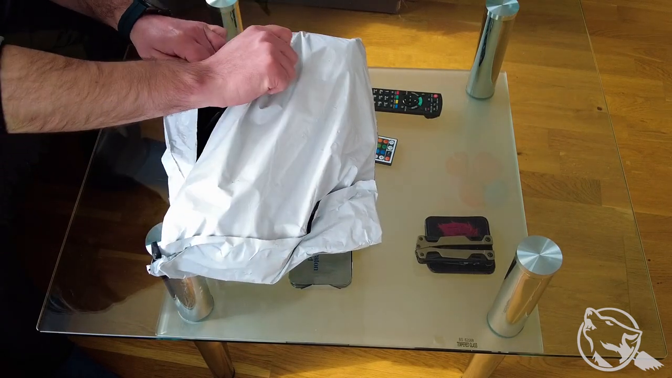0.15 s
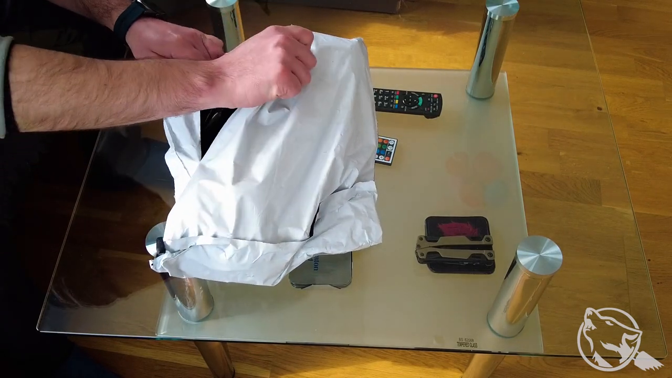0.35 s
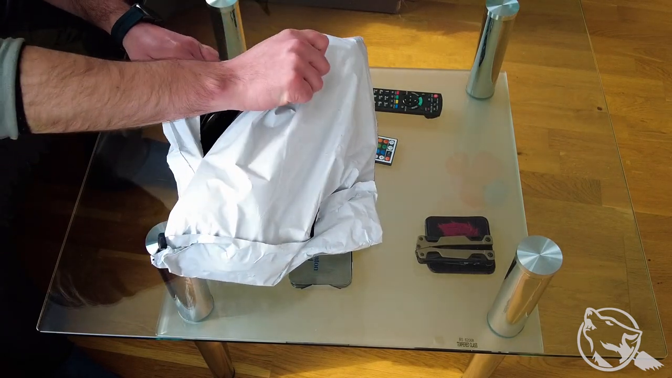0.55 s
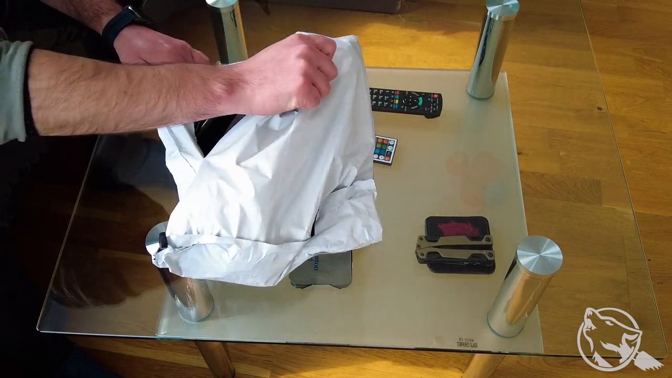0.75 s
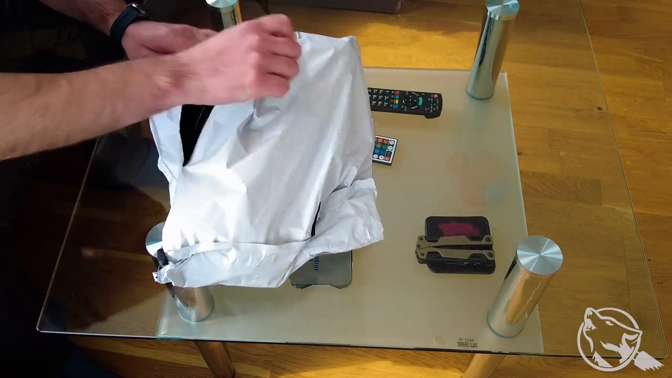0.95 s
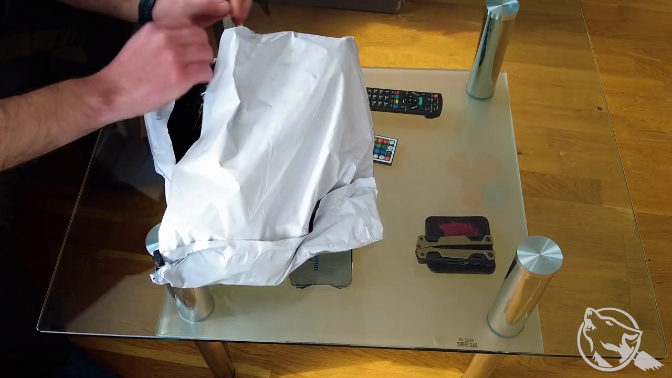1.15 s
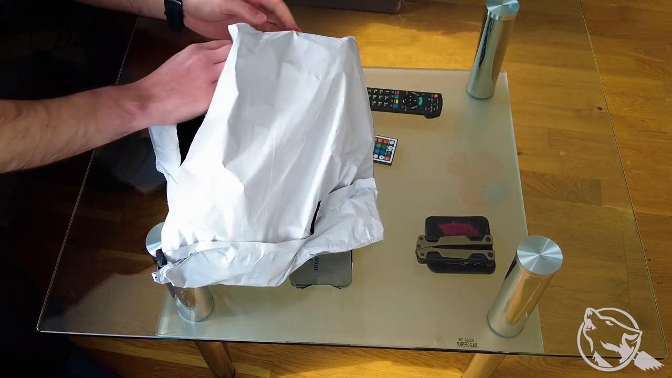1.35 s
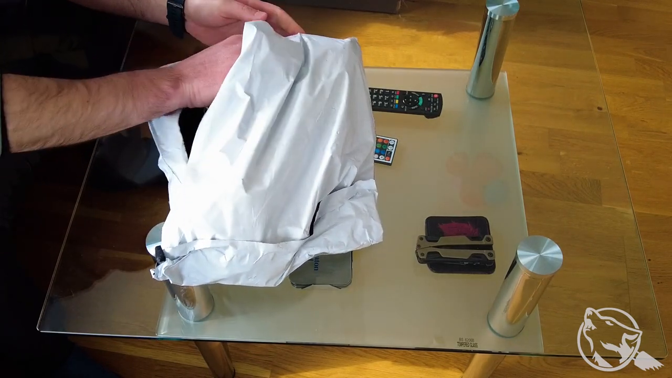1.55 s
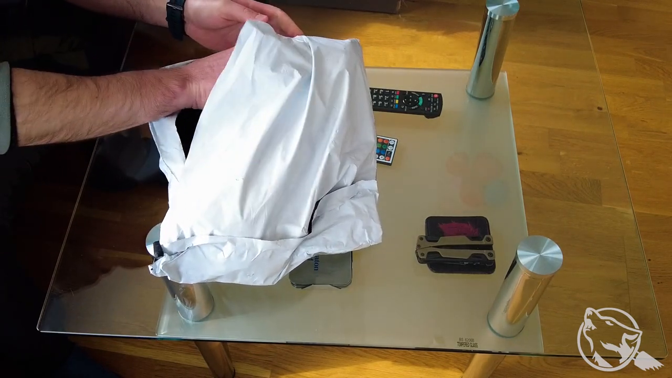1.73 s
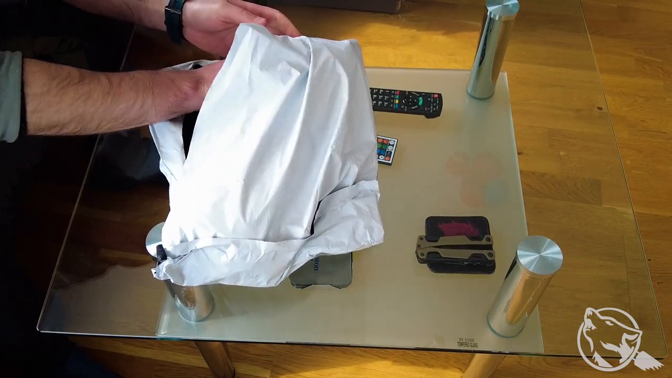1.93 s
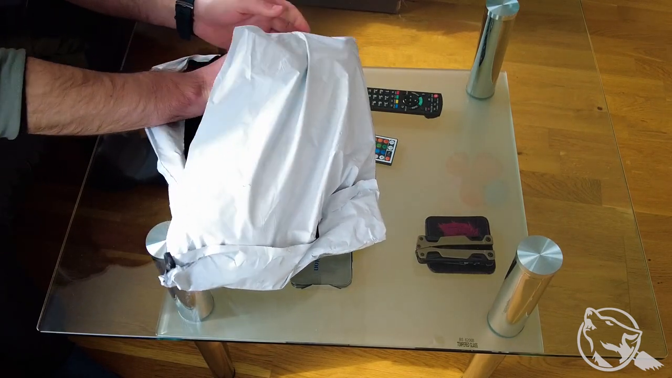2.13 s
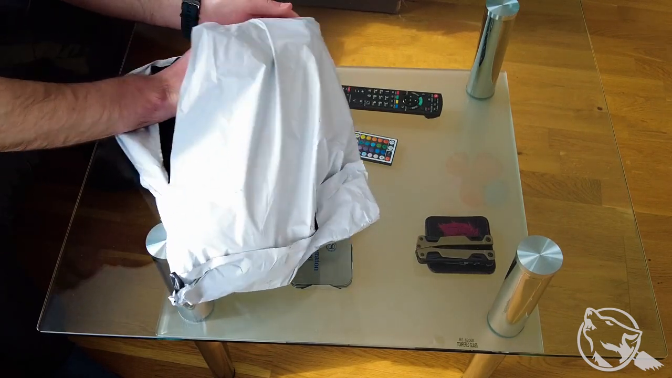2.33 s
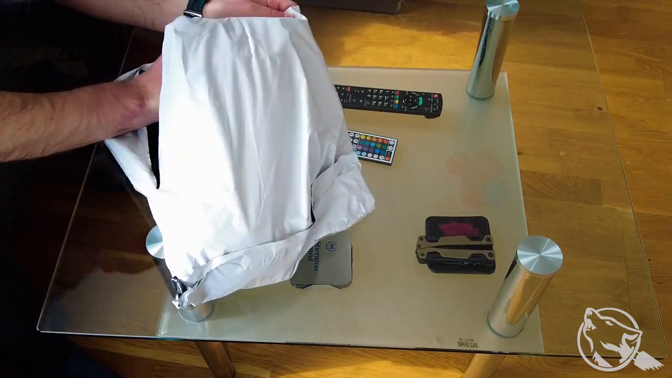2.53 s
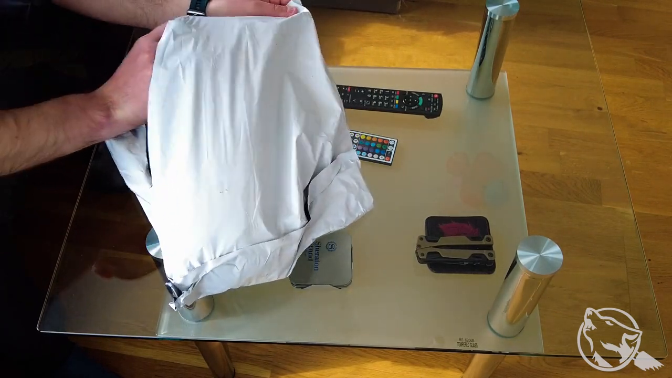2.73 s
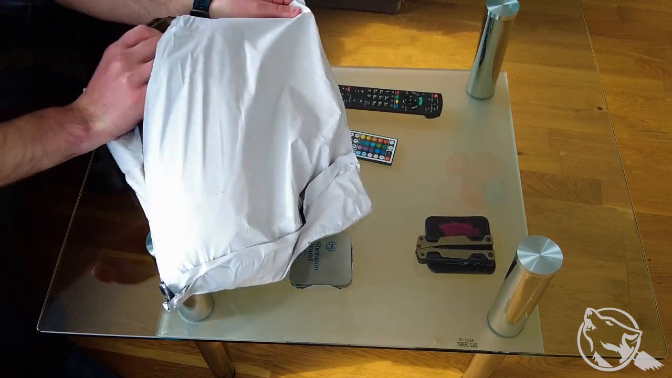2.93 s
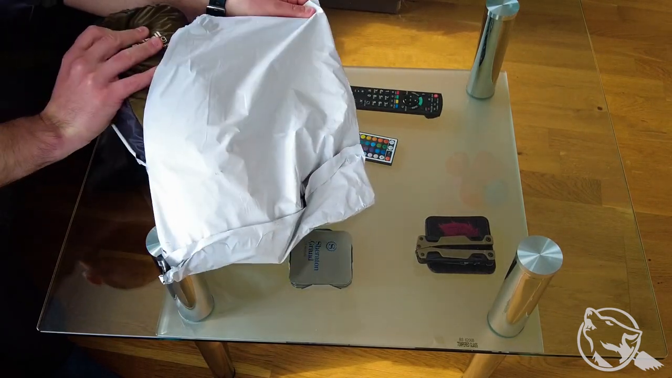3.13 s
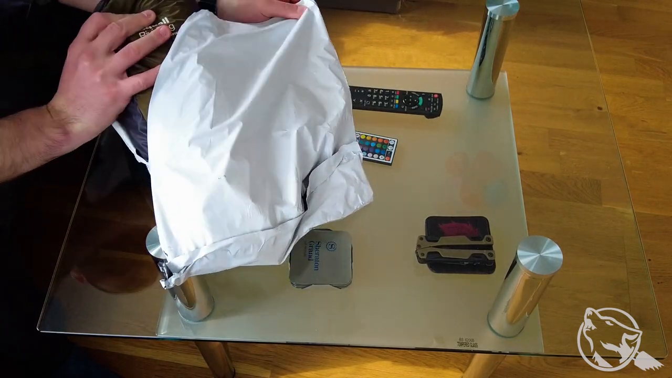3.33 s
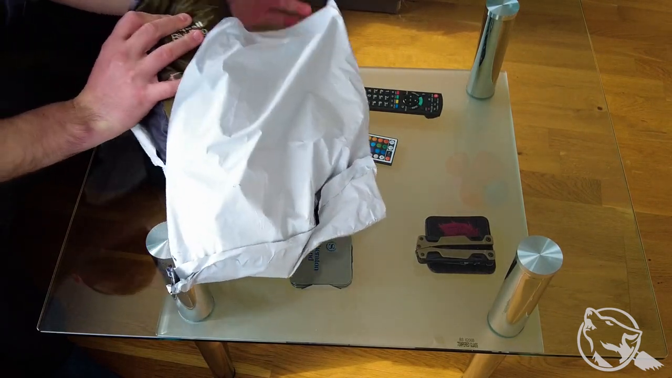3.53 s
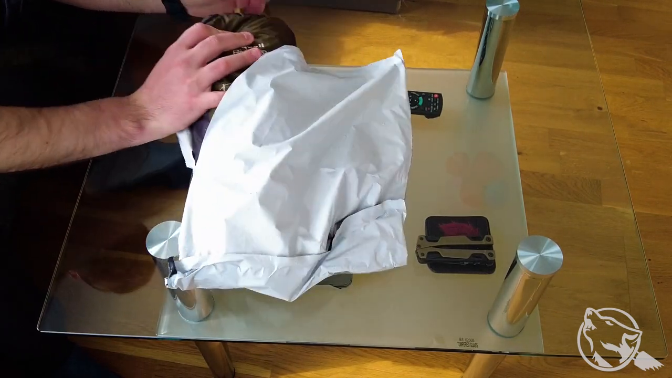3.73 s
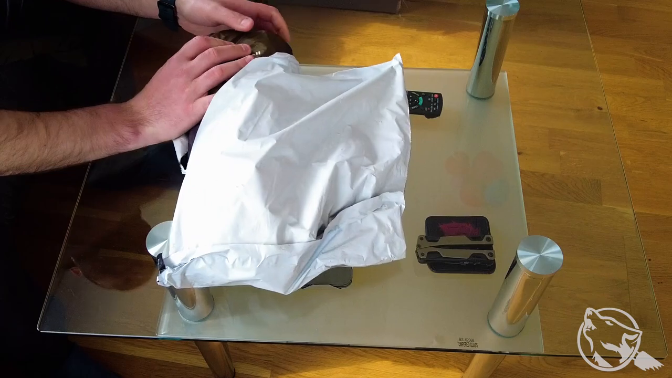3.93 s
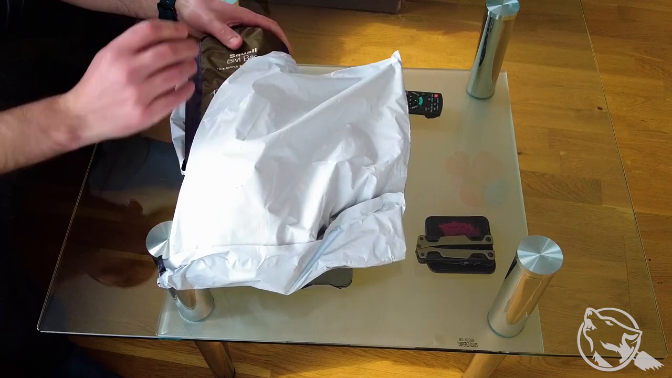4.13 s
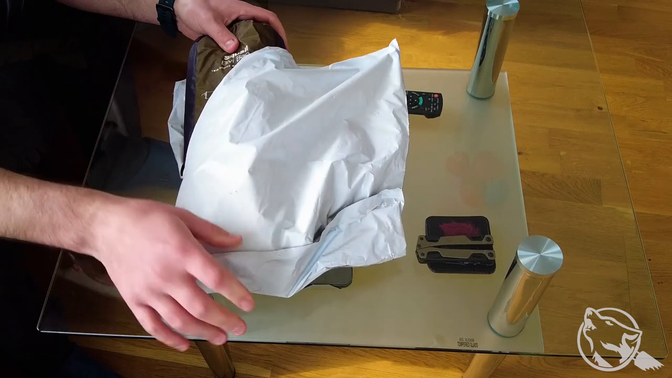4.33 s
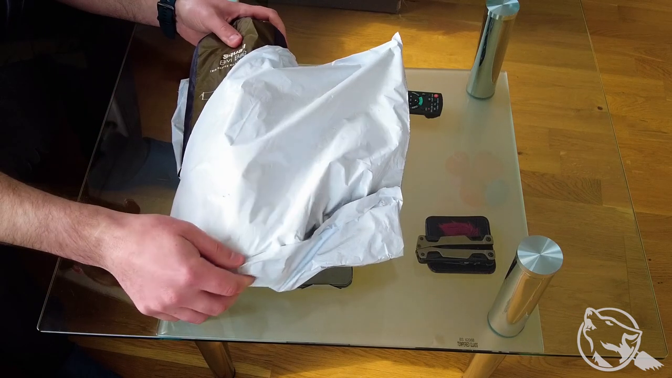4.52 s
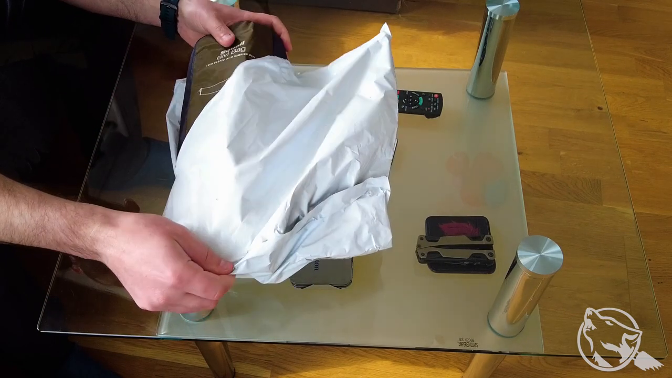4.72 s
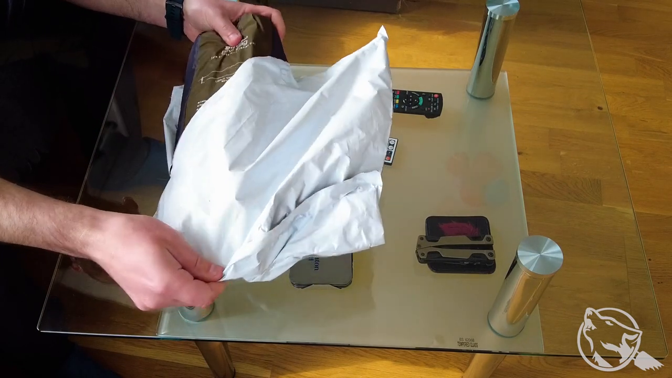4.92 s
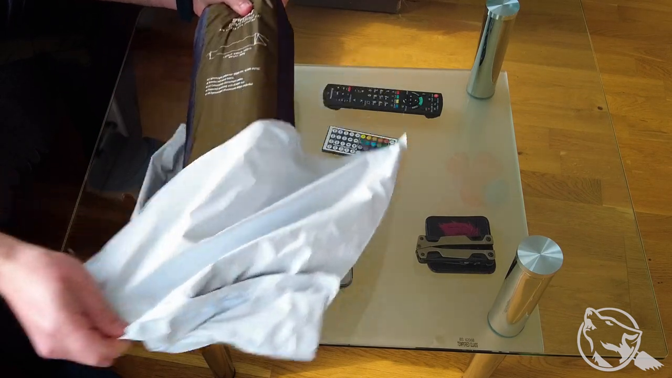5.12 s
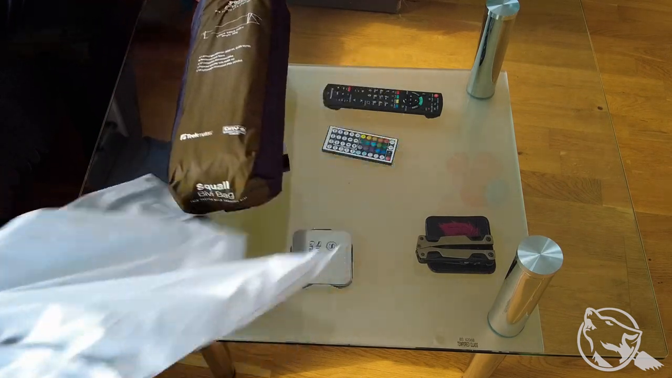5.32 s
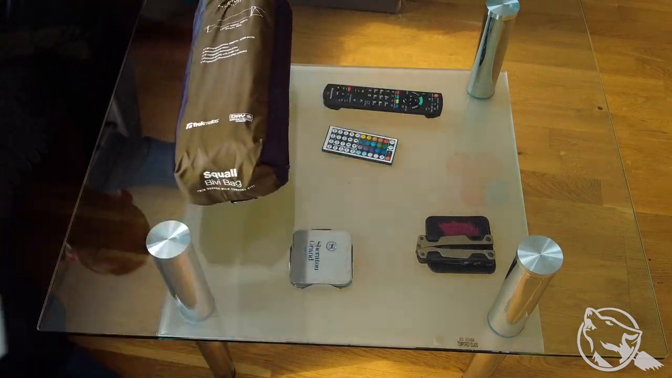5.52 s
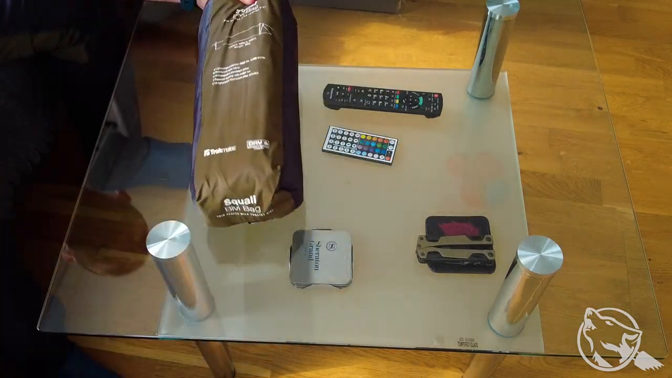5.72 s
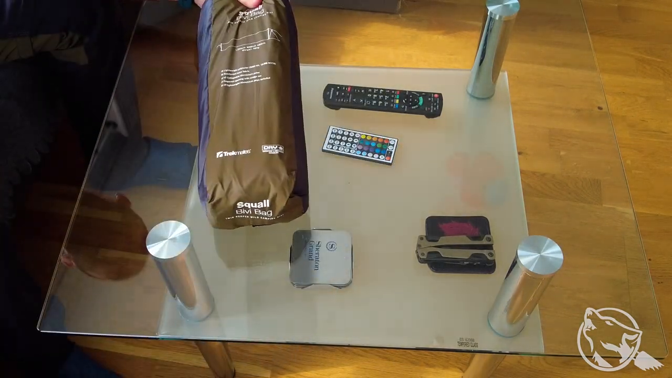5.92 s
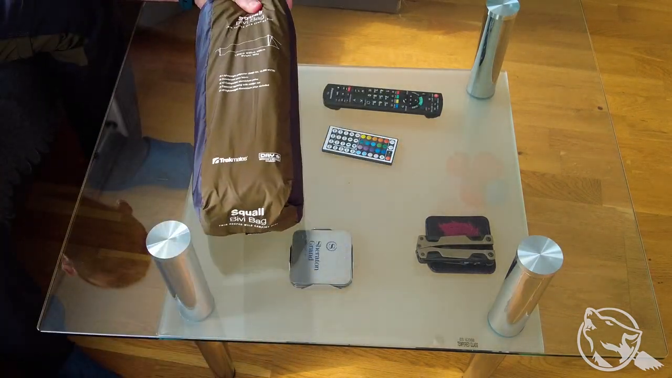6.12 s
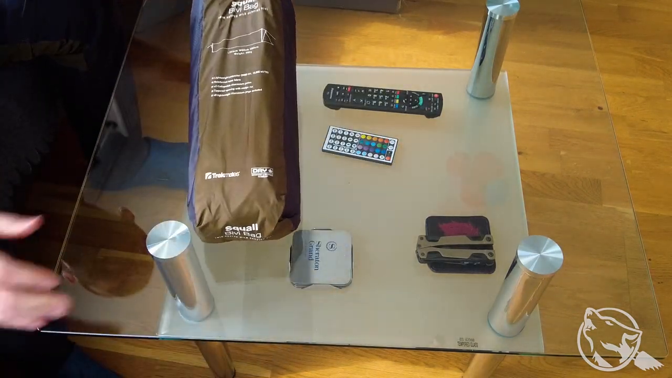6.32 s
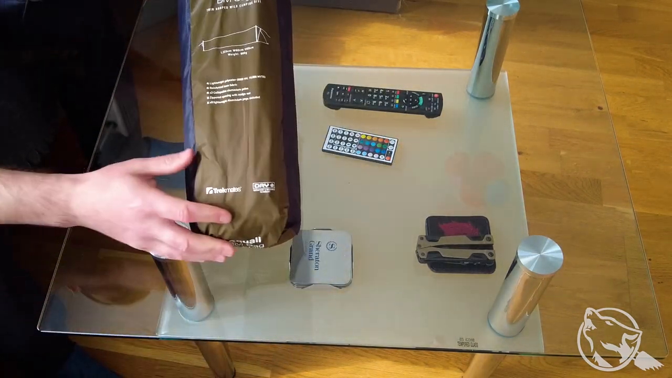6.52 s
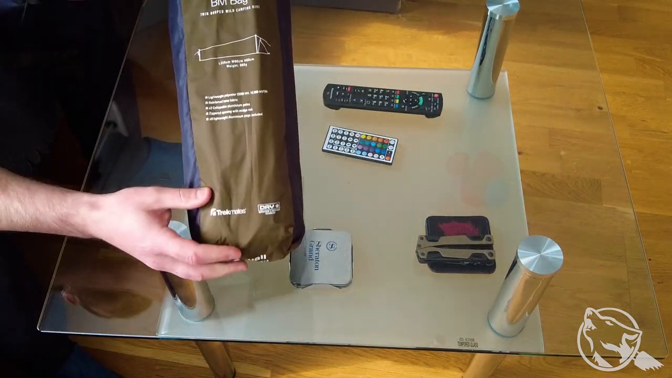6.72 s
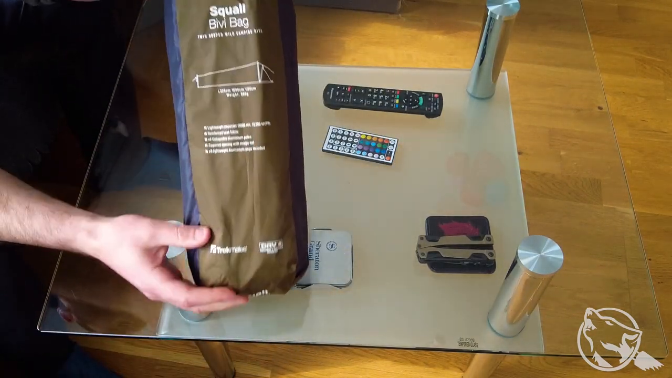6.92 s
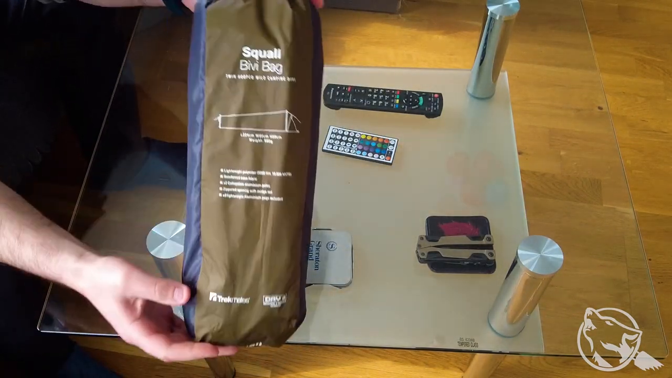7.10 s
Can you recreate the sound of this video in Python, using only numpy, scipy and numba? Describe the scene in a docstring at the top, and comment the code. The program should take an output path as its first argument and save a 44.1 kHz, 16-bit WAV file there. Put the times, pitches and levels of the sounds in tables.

```python
"""Creases in thin plastic film snap one by one over a dense crackle while the sheet flexes, flaps and slides:
hands pull a packed fabric stuff sack out of a mailer bag over a glass table, in a living room.
Film is modelled as ringing facets and filtered noise, the sack as soft blows, airy strokes and a damped thud.
The empty bag is swept away, and the sack is set down and stroked. One microphone close by hears it all
over a low room rumble."""
import sys
import numpy as np
from scipy import signal
from scipy.fft import rfft, irfft
from scipy.io import wavfile
from scipy.ndimage import uniform_filter1d
from numba import njit

SR = 44100
rng = np.random.default_rng(int(sys.argv[2]) if len(sys.argv) > 2 else 0)


def pcm_store(signal):
    """Save signal as 16-bit PCM."""
    levels = np.round(np.clip(np.atleast_2d(signal), -1, 1) * 32767)
    wavfile.write(sys.argv[1], SR, levels.astype(np.int16).T)


N = 319989
TIME = np.arange(N) / SR

# kind of motion of the film, and of the sack's fabric from 5.7 s, changing gradually between the points:
# time_s, slide_share (smooth sliding against crumpling, 0-1),
# tilt_db (treble raised and the rest lowered by this), panel_hz (mean resonance of the flexing panel)
SURFACE_MOTION = [(0, 0.17, -2.5, 1910), (.6, 0, 2.5, 1410), (1.1, 0.31, -1, 1520), (1.4, 0.52, 3, 880),
                  (2.3, 0.27, -1, 1060), (2.65, 0.47, 3, 815), (2.95, 1, 3.5, 1050),
                  (3.17, 0.8, -0.5, 1530), (3.45, 0.58, 2.5, 1080), (3.95, 0.5, 1.5, 840),
                  (4.4, 0.4, 0.5, 1820), (5.15, 0.35, 3, 1870), (5.4, 0.85, 0, 1500),
                  (5.7, 0.12, -1.5, 2000), (6.15, 0.67, 0, 2200), (6.75, 0.84, 4.5, 1810),
                  (7.26, 0.9, 12, 2230)]
# spectrum of the flexing sheet: frequency_hz, relative_level_db
SHEET_SPECTRUM = [(160, -18.5), (270, 3), (400, 1), (560, 1), (760, 2), (1050, 1.5), (1350, -1.5),
                  (2000, -2.5), (2600, -6), (3600, -16.5)]


def effort():
    """Force envelopes: each move builds up, eases while it holds, and decays exponentially; powers add.

    Returns the levels in dB of the crackle, the flexing sheet and the flapping bag."""
    # grabs, tugs and pushes of the hands: start_s, length_s, crackle_db, flexing_db, flapping_db
    # the bag's mouth is pulled open; a hand reaches inside from 1.35 s; the sack is worked out from 2.48 s;
    # the bag is drawn off and swept away from 4.29 s; the sack is set down and turned from 5.67 s
    moves = [ (-.02, 0.11, -46.5, -44.5, -54), (0.139, .1, -41.5, -40, -49), (0.284, 0.13, -41.5, -42, -51),
             (0.444, 0.11, -49.5, -51, -64), (.54, 0.12, -43.5, -45, -53), (0.683, 0.27, -48, -50.5, -58),
             (0.953, 0.15, -41, -42.5, -48), (1.353, 0.16, -54.5, -51, -53.5),
             (1.484, 0.062, -48, -47, -49.5), (1.574, 0.068, -51, -49, -51),
             (1.645, 0.054, -44.5, -47.5, -52.5), (1.788, 0.055, -42.5, -43.5, -48.5),
             (1.87, 0.5, -49.5, -50, -56.5), (2.177, 0.033, -50.5, -45, -51), (2.255, 0.065, -59, -53, -66),
             (2.411, 0.023, -47.5, -43, -54), (2.479, 0.11, -44, -46, -55.5),
             (2.628, 0.12, -37, -39.5, -50), (2.768, 0.28, -43.5, -47, -55.5), (3.06, .13, -36, -40.5, -46),
             (3.215, 0.15, -54.5, -50.5, -59), (3.362, 0.11, -48.5, -49, -61),
             (3.464, 0.049, -46, -46.5, -62), (3.702, 0.2, -54.5, -56, -64),
             (3.886, 0.067, -47, -49.5, -59), (3.956, 0.17, -55, -52, -60.5),
             (4.287, 0.068, -52.5, -53.5, -61), (4.389, 0.084, -58.5, -56.5, -59),
             (4.504, 0.055, -46, -44, -50), (4.581, 0.099, -44.5, -44, -55),
             (4.7, 0.074, -44, -42.5, -56.5), (4.787, 0.07, -39, -40, -57),
             (4.912, 0.12, -43.5, -48.5, -60), (4.997, 0.067, -39, -38, -55), (5.102, 0.056, -37, -38, -49),
             (5.206, .21, -40.5, -41, -50), (5.479, 0.09, -58.5, -55.5, -60), (5.674, 0.017, -60, -61, -60),
             (5.819, 0.025, -65.5, -60, -63.5), (5.933, 0.071, -53.5, -54.5, -66),
             (6.087, 0.021, -53, -47, -54), (6.12, 0.079, -44.5, -44.5, -50), (6.452, 0.088, -65, -68, -67),
             (6.531, 0.11, -59, -59.5, -69), (6.686, 0.058, -60, -62.5, -61), (6.75, 0.44, -70, -69.5, -65)]
    attack_s, ease_db_per_s, release_s = 0.02, -13, 0.04
    build_share = 0.13  # long moves take this share of their length more to build up
    holding_db = -75  # film and fabric that are merely held
    power = np.full((3, N), undb(holding_db) ** 2)
    for start_s, length_s, *levels_db in moves:
        age = np.maximum(TIME - start_s, 0)
        build = np.minimum(age / (attack_s + build_share * length_s), 1)
        ease = undb(ease_db_per_s * np.minimum(age, length_s))
        settle = np.exp(-np.maximum(age - length_s, 0) / release_s)
        power += np.outer(undb(levels_db), build * ease * settle) ** 2
    return 10 * np.log10(power)


def snaps(rows, cycles=2.2, crack_db=-2, crack_s=0.0011, sheet_s=0.0015, couple=0.3, sheet_trim_db=-2.0):
    """Snap-through buckling: a facet rings, wrinkles beside it crack, the sheet gives a short pop."""
    crack_spectrum = [(800, -21), (2400, -0.5), (5000, 3), (8000, 3.5), (11000, -6.5), (16000, -20.5)]  # cracking wrinkles: frequency_hz, relative_level_db
    out = np.zeros(N)
    for start_s, snap_db, pitch_hz, sheet_db in rows:
        # a facet radiates little below its own pitch
        edge = signal.butter(3, min(.5 * pitch_hz, SR / 4), "high", fs=SR, output="sos")
        crack = unit(signal.sosfilt(edge, colour(burst(crack_s), crack_spectrum)))
        # a crease that hardly moves the sheet sets off few wrinkles and rings more purely
        wrinkles = undb(crack_db + couple * np.clip(sheet_db - snap_db + 13.5, -16, 6))
        ring = facet(pitch_hz, cycles, size=1024)
        add(out, start_s, undb(snap_db) * unit(ring + wrinkles * crack))
        pop = unit(colour(burst(sheet_s), SHEET_SPECTRUM))
        add(out, start_s, undb(sheet_db + sheet_trim_db) * pop)
    return out


def small_snaps(crease_db, until_s=5.6, above_db=25, spread_db=3, low_hz=2400, high_hz=8400, sheet_db=-10,
                count=100):
    """Random buckling: more creases flip while film crumples rather than slides, as strong as the move is.

    Returns rows for snaps()."""
    slide = curves(SURFACE_MOTION)[0]
    rows = []
    for when, chance, strength, pitch, coupling in rng.random((count, 5)):
        start_s = when * until_s
        i = min(int(start_s * SR), N - 1)
        if chance > slide[i]:
            snap_db = crease_db[i] + above_db + spread_db * (2 * strength - 1)
            pitch_hz = low_hz + pitch * (high_hz - low_hz)
            rows.append((start_s, snap_db, pitch_hz, snap_db + 2 * coupling * sheet_db))
    return rows


def rustle(crease_db, sheet_db, flap_db, grip_db=2.26, grip_s=0.0046, even_s=0.0523, panel_db=-1,
           panel_width=0.38, sheet_trim_db=-1.33):
    """Crumpling is many small buckles; sliding is friction noise that catches and lets go on small wrinkles."""
    # spectra of the fine creases and of the flapping bag: frequency_hz, relative_level_db
    crease_spectrum = [(1400, -26.5), (2300, -5), (3300, 0), (4700, 1), (5700, 0.5), (7200, 1), (8800, -3),
                       (10200, -9), (11700, -13.5), (13000, -11.5), (16000, -20)]
    flap_spectrum = [(35, 1), (65, -2), (120, -1), (175, 0), (230, 0.5), (330, -8.5), (600, -50)]
    # the hands never pull evenly: the sheet flexes in small surges
    surge_db, surge_s, panel_wander_octaves = 1.82, 0.022, 0.21
    slide, tilt_db, panel_hz = curves(SURFACE_MOTION)
    slide = np.clip(slide, 0, 1)
    grip = uniform_filter1d(rng.standard_normal(N), int(grip_s * SR) + 1)
    grip = undb(grip_db * grip / grip.std())

    def crumple_and_slide(crumple):
        """Sliding and crumpling share the power."""
        friction = steady(grip * rng.standard_normal(N), even_s)
        return np.sqrt(1 - slide) * steady(crumple, even_s) + np.sqrt(slide) * friction

    fine, broad = (crumple_and_slide(crumple) for crumple in crinkles())
    fine = colour(fine, crease_spectrum)
    # taut film has smaller, brighter facets than slack film
    slack = signal.sosfiltfilt(signal.butter(2, 5200, fs=SR, output="sos"), fine)
    taut = fine - slack
    fine = steady(slack * undb(-tilt_db) + taut * undb(tilt_db), even_s)
    # the panel that is being bent changes size, and its resonance moves with it
    panel_hz = np.clip(panel_hz * 2 ** (panel_wander_octaves * wander(surge_s)), 20, SR / 4)
    sheet_db = sheet_db + surge_db * wander(surge_s)
    sheet = colour(broad, SHEET_SPECTRUM)
    panel = resonance(sheet, panel_hz, panel_width)
    sheet = steady(sheet + undb(panel_db) * panel, even_s)
    flap = steady(colour(broad, flap_spectrum), even_s)
    return fine * undb(crease_db) + sheet * undb(sheet_db + sheet_trim_db) + flap * undb(flap_db)


def crinkles(spread_db=5.5, own_db=5.5, cycles=0.99, sheet_decay_s=0.0014, scatter_db=-2, count=8000):
    """Crackling noise: countless buckles, few large and many small, each ring a facet and shake the sheet."""
    fine, broad = np.zeros(N), np.zeros(N)
    for when, strength, pitch, coupling in rng.random((count, 4)):
        start_s = when * N / SR
        gain = undb(-spread_db * np.log(max(strength, .02)))
        scatter = burst(sheet_decay_s, size=256)
        ring = facet(2000 + 12000 * pitch, cycles * (1 + 2 * pitch))
        add(fine, start_s, gain * (ring + undb(scatter_db) * scatter))
        add(broad, start_s, gain * undb(own_db * (2 * coupling - 1)) * scatter)
    return fine, broad


def facet(hz, cycles, size=256):
    """Damped oscillation: a small facet of film falls to 1/e in the given number of cycles."""
    t = np.arange(size) / SR
    return unit(np.sin(2 * np.pi * hz * t) * np.exp(-t * hz / cycles))


def burst(decay_s, size=1024):
    """Scattering: a buckle spreads through neighbouring wrinkles as a short dying noise."""
    return unit(rng.standard_normal(size) * np.exp(-np.arange(size) / SR / decay_s))


def bumps(decay_s=0.011, give_db=-3, trim_db=-3.0):
    """Damped impact: a soft blow on the padded sack is one firm push, then the filling gives for a moment."""
    # dull bumps of hands and sack: start_s, level_db (energy before the trim)
    blows = [(1.08, -9.5), (1.098, -8.5), (1.683, -9), (1.837, -11), (2.198, -11), (2.217, -18.5),
             (3.086, -22), (3.099, -8.5), (3.492, -18), (5.696, -19.5), (6.142, -19), (6.448, -19.5)]
    thud_spectrum = [(40, 2.5), (110, -2), (280, 1.5), (450, -4.5), (800, -10), (1600, -28), (5000, -40)]  # frequency_hz, relative_level_db
    out = np.zeros(N)
    for start_s, level_db in blows:
        push = undb(give_db) * burst(decay_s, size=4096)
        push[0] += 1
        add(out, start_s, undb(level_db + trim_db) * unit(colour(push, thud_spectrum)))
    return out


def set_down(start_s=6.138, hz=108, decay_s=0.022, level_db=-39, size=8192):
    """Damped oscillation: the sack lands on the glass top with a low, quickly dying thud."""
    out, t = np.zeros(N), np.arange(size) / SR
    add(out, start_s, undb(level_db) * np.sin(2 * np.pi * hz * t) * np.exp(-t / decay_s))
    return out


def swishes(weave_db=-1.5, weave_s=0.006):
    """Friction noise: the fine weave gives an airy hiss that swells and fades with each stroke."""
    # skin and film gliding over the sack's nylon: centre_s, length_s (centre to 1/e), level_db
    strokes = [(3.147, 0.093, -44), (4.093, 0.061, -55.5), (6.72, 0.13, -66.5), (7.132, 0.1, -71.5)]
    nylon_spectrum = [(1000, -17), (2800, -6), (4300, -10), (6500, 2), (8800, 9), (11000, 2), (14000, -4),
                      (16000, -10)]  # frequency_hz, relative_level_db
    stroke = swells(strokes)
    drag = uniform_filter1d(rng.standard_normal(N), int(weave_s * SR) + 1)
    hiss = colour(rng.standard_normal(N), nylon_spectrum)
    return stroke * undb(weave_db * drag / drag.std()) * hiss


def rumble(level_db=-58, draught_hz=32, drone_hz=52, drone_width=0.17, drone_db=-61.0):
    """Filtered noise: low room noise, a narrow resonant drone, and slow puffs of air from large movements."""
    # air pushed at the microphone by the moving bag and sack: centre_s, length_s (centre to 1/e), level_db
    draughts = [(0.927, 0.041, -45), (1.09, 0.088, -48), (1.845, 0.083, -50), (3.12, 0.063, -56),
                (5.962, 0.095, -42.5), (6.566, 0.041, -41)]
    rumble_spectrum = [(10, -2), (24, -1), (37, -11), (70, -24), (100, -21.5), (200, -28), (1000, -25.5),
                       (12000, -44)]  # frequency_hz, relative_level_db
    air = signal.sosfilt(signal.butter(3, draught_hz, fs=SR, output="sos"), rng.standard_normal(N))
    puffs = swells(draughts) * steady(air, 0.18)
    centre = np.full(N, float(drone_hz))
    drone = resonance(rng.standard_normal(N), centre, drone_width)
    drone = steady(resonance(drone, centre, drone_width), 0.28)
    room_noise = colour(rng.standard_normal(N), rumble_spectrum, size=16384)
    return undb(level_db) * room_noise + undb(drone_db) * drone + puffs


def room(x, table_s=.0026, table_db=-14, build_s=0.00073, size=24000):
    """Reverberation: a reflection off the glass top, then a diffuse tail whose treble dies first."""
    t60_s, treble_t60_s, tail_db = 0.5, 0.31, -16
    t = np.arange(size) / SR
    noise = rng.standard_normal(size)
    low = signal.sosfilt(signal.butter(1, 3500, fs=SR, output="sos"), noise)
    treble = 0.38 * (noise - low)
    tail = low * undb(-60 * t / t60_s) + treble * undb(-60 * t / treble_t60_s)
    response = undb(tail_db) * unit(tail * (1 - np.exp(-(t / build_s) ** 2)))
    response[0] += 1  # direct sound
    response[int(table_s * SR)] += undb(table_db)
    return signal.fftconvolve(x, unit(response))[:N]


def undb(db):
    """Logarithmic level: decibels to amplitude gain."""
    return 10 ** (np.asarray(db) / 20)


def unit(x):
    """Energy normalisation: scale the sum of squares to one."""
    return x / np.sqrt(np.sum(x ** 2) + 1e-18)


def curves(table):
    """Linear interpolation: the columns of a table, joined by straight lines in time."""
    s, *columns = np.transpose(table)
    return [np.interp(TIME, s, c) for c in columns]


def add(out, s, x):
    """Superposition: mix x into out at time s."""
    i = int(np.clip(s * SR, 0, N - 1))
    out[i:i + len(x)] += x[:N - i]


def swells(rows):
    """Gaussian envelopes: the summed gain of rows of centre_s, length_s, level_db."""
    return sum(undb(db) * np.exp(-((TIME - s) / length) ** 2) for s, length, db in rows)


def colour(x, spectrum, size=2048):
    """Minimum-phase filtering: a causal response of unit energy with the given spectrum."""
    hz, db = np.transpose(spectrum)
    grid = np.maximum(np.arange(size // 2 + 1) * SR / size, 1)
    # the level drops by 37 dB above the last frequency
    level_db = np.interp(np.log(grid), np.log(hz), db, right=db[-1] - 37.0)
    # folding the cepstrum onto positive time makes the response causal
    cepstrum = irfft(np.log(undb(level_db)))
    cepstrum[1:size // 2] *= 2
    cepstrum[size // 2 + 1:] = 0
    response = unit(irfft(np.exp(rfft(cepstrum))))
    return signal.fftconvolve(x, response)[:len(x)]


def steady(x, seconds):
    """Level normalisation: hold the short-time rms of x near one."""
    return x / np.sqrt(np.maximum(uniform_filter1d(x ** 2, int(seconds * SR) + 1), 0) + 1e-12)


def wander(seconds):
    """Low-pass randomness: noise averaged twice over the given time, with a standard deviation of one."""
    span = int(seconds * SR) + 1
    walk = uniform_filter1d(uniform_filter1d(rng.standard_normal(N), span), span)
    return walk / walk.std()


@njit
def resonance(x, hz, width):
    """Resonance: a state-variable band-pass with a moving centre; width is relative to the centre."""
    y, band, low = np.empty(len(x)), 0., 0.
    for i in range(len(x)):
        g = np.tan(np.pi * hz[i] / SR)
        v = (band + g * (x[i] - low)) / (1 + g * (g + width))
        band, low, y[i] = 2 * v - band, low + 2 * g * v, width * v
    return y


def scene():
    """Superposition: bag and sack sound in the room, over its rumble."""
    # separately placed clicks: creases that snap through, faint ticks, and a scuff as the sack is set down:
    # start_s, snap_db (energy), pitch_hz (of the facet), sheet_db (energy of the sheet, before the trim)
    placed_clicks = [(0.0743, -13, 3190, -12.5), (0.0834, -13, 3500, -15), (0.1355, -6.5, 3940, -24),
                     (0.1926, -7.5, 4800, -16), (0.224, -2.5, 6050, -10), (0.2512, -6, 2800, -12),
                     (0.2877, -6, 2620, -9.5), (0.3395, -6.5, 2630, -10), (0.3507, -7, 4860, -11),
                     (0.4068, -6.5, 2580, -13), (0.4492, -12, 8300, -46), (0.5205, -14, 6840, -15.5),
                     (0.551, -12.5, 5120, -13), (0.5988, -11.5, 3920, -27), (0.611, -10, 5200, -19),
                     (0.6175, -7.5, 4500, -16), (0.647, -9, 5200, -13), (0.6674, -4.5, 4630, -41),
                     (0.7496, -15.5, 7040, -30), (0.9636, -12, 5300, -44), (0.9988, -12.5, 7700, -17),
                     (1.0454, -2.5, 4450, -21), (1.0796, -2, 7140, -8.5), (1.1521, -8.5, 5650, -15.5),
                     (1.322, -19, 4470, -27), (1.4614, -17, 4770, -15.5), (1.5221, -12, 4900, -30),
                     (1.5973, -15.5, 6900, -26), (1.615, -13, 8850, -38), (1.6643, -14, 7550, -16),
                     (1.7742, -20.5, 6600, -18.5), (1.837, -8.5, 4830, -9.5), (1.902, -17.5, 7040, -15),
                     (1.919, -14, 2710, -14), (1.9737, -15.5, 6750, -15.5), (1.993, -14.5, 4020, -37),
                     (2.0663, -16, 5560, -19.5), (2.0998, -11.5, 5000, -18), (2.124, -16.5, 5730, -18.5),
                     (2.1968, -16.5, 2870, -13), (2.4041, -25, 3300, -19), (2.4921, -18, 4650, -17.5),
                     (2.5003, -13.5, 4500, -21), (2.5561, -12, 3780, -40), (2.5806, -8.5, 7100, -22),
                     (2.597, -11.5, 6600, -13), (2.6315, -11.5, 7300, -18), (2.655, -8, 6440, -11),
                     (2.6709, -5, 7700, -18), (3.0612, -13, 4930, -29), (3.0865, -11, 5920, -33),
                     (3.098, -11, 9900, -36), (3.1619, -12, 5330, -8), (3.2308, -12, 5730, -21),
                     (3.3507, -15, 8100, -22), (3.357, -15.5, 6240, -19), (3.5677, -21, 6540, -21.5),
                     (3.6296, -25, 5600, -40), (3.7373, -21, 7540, -23), (3.753, -14, 7200, -29),
                     (3.8058, -11.5, 7140, -42), (3.9746, -21.5, 5100, -19.5), (4.1197, -19.5, 6250, -28),
                     (4.2595, -20.5, 7300, -33), (4.4002, -23, 7460, -30), (4.453, -22.5, 5030, -35),
                     (4.533, -12.5, 2670, -13), (4.6517, -11, 7900, -40), (4.7506, -9, 5270, -12.5),
                     (4.7773, -10.5, 7400, -38), (4.796, -9, 7000, -32), (4.819, -9.5, 4850, -17),
                     (4.9055, -19, 2190, -20), (4.9631, -14.5, 6600, -24), (5.064, -7, 7000, -27),
                     (5.1319, -14, 6420, -29), (5.2667, -6.5, 5900, -9.5), (5.2728, -1, 8240, -9.5),
                     (5.3998, -8, 5100, -13.5), (5.4343, -12, 4630, -21), (5.537, -22.5, 8550, -40),
                     (5.62, -30.5, 3800, -31), (5.7003, -31, 7700, -24.5), (6.0964, -24, 2600, -24),
                     (6.148, -10, 8250, -14)]
    crease_db, sheet_db, flap_db = effort()
    sack = swishes() + bumps() + set_down()
    bag = rustle(crease_db, sheet_db, flap_db)
    bag += snaps(placed_clicks) + snaps(small_snaps(crease_db))
    return (room(bag + sack) + rumble())[None]


def record(dry):
    """Band limiting: the recorder cuts the top with a steep elliptic low-pass."""
    top_hz = 16100
    return signal.sosfilt(signal.ellip(8, .2, 70, top_hz, fs=SR, output="sos"), dry)


dry = scene()
out = record(dry)
pcm_store(out)
```